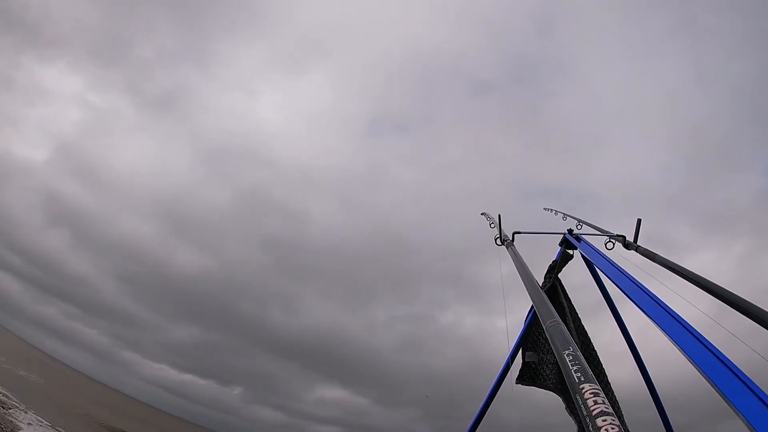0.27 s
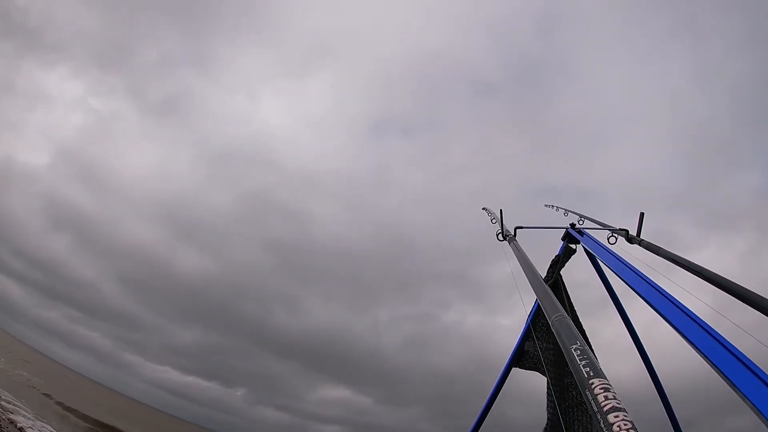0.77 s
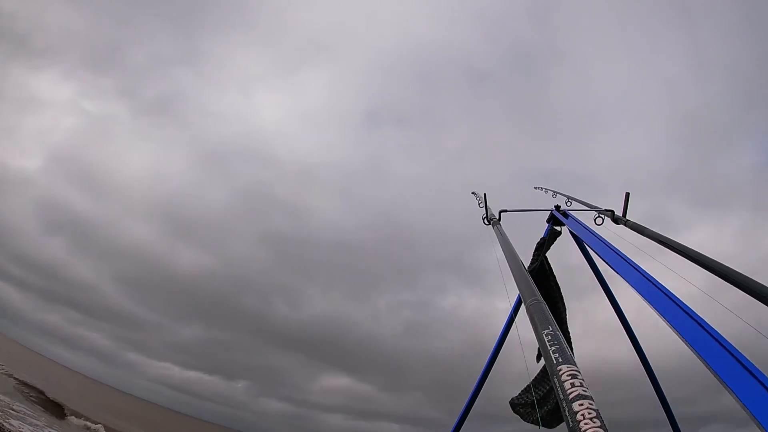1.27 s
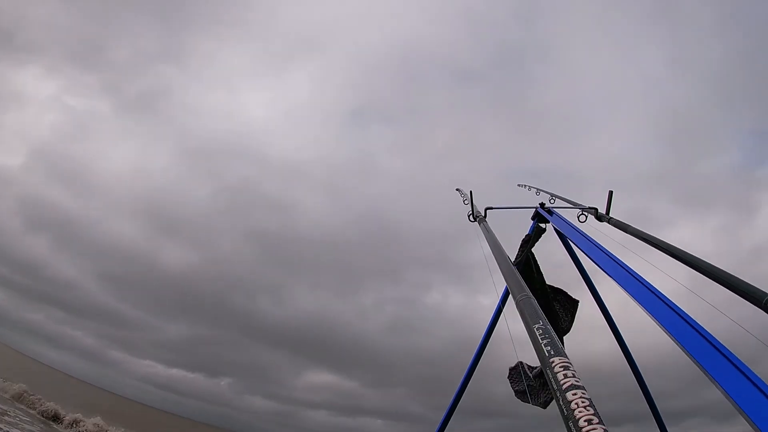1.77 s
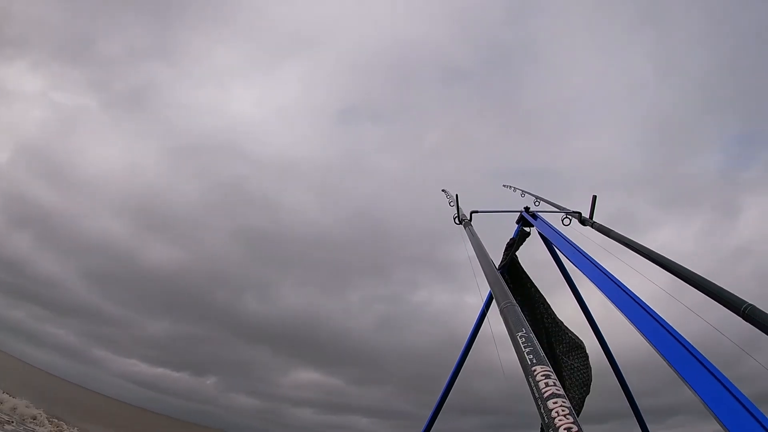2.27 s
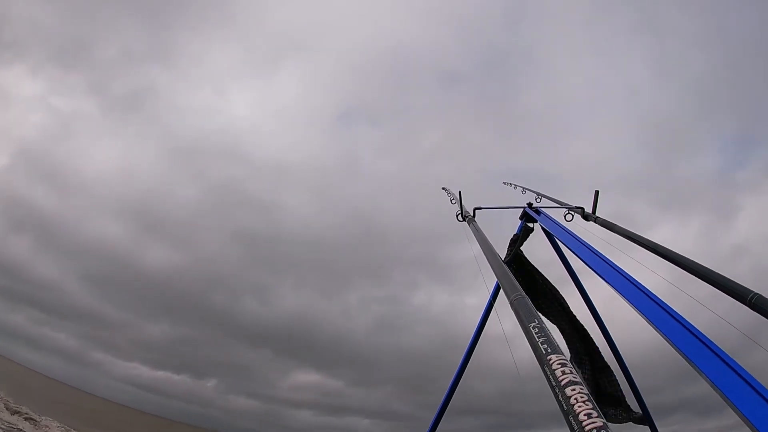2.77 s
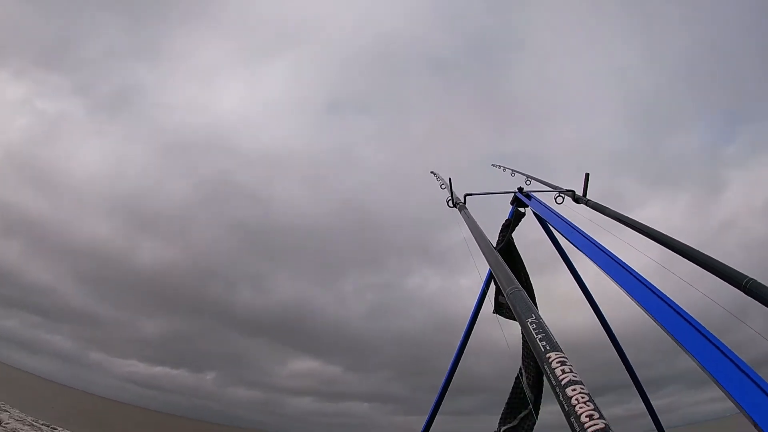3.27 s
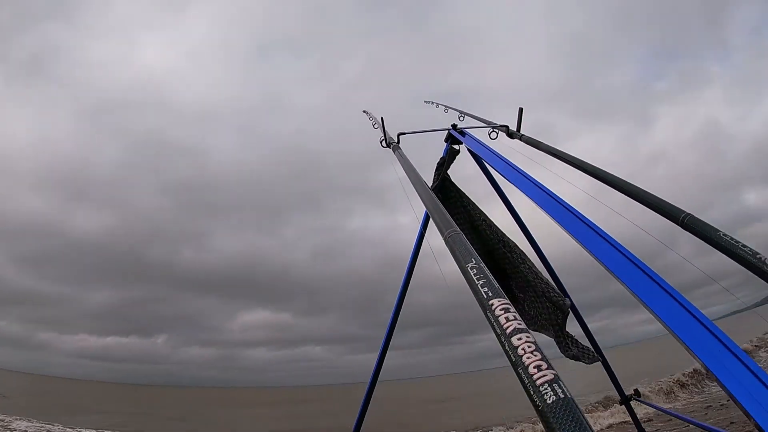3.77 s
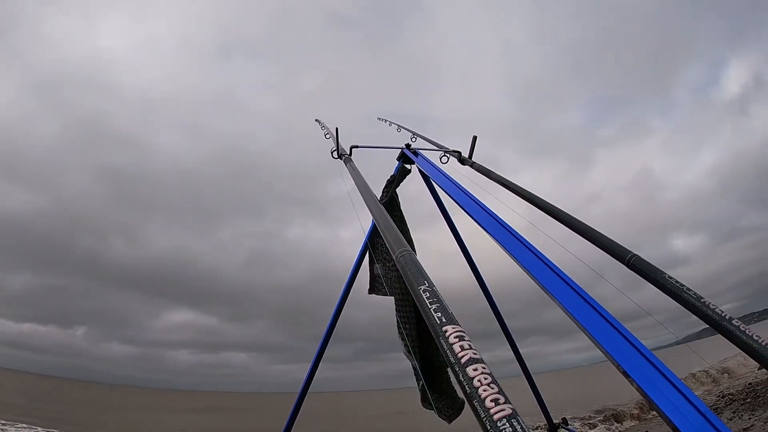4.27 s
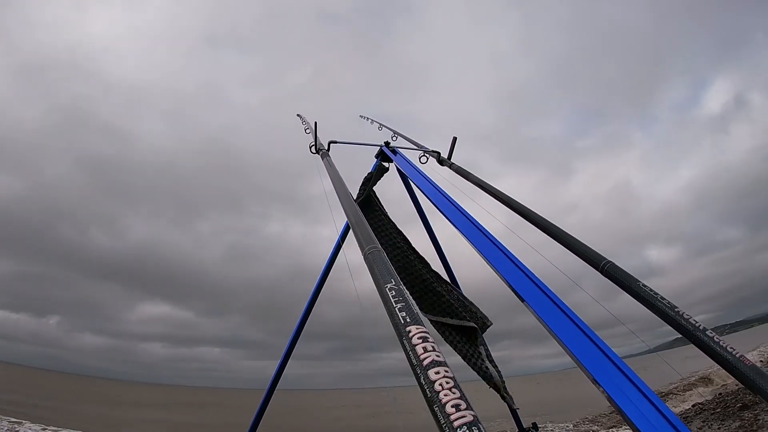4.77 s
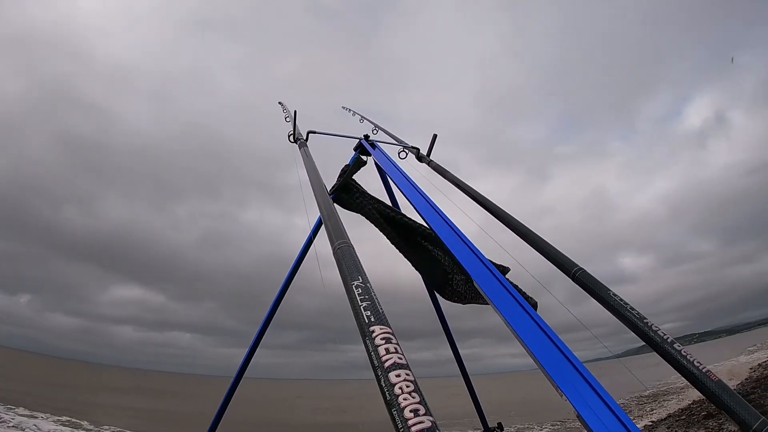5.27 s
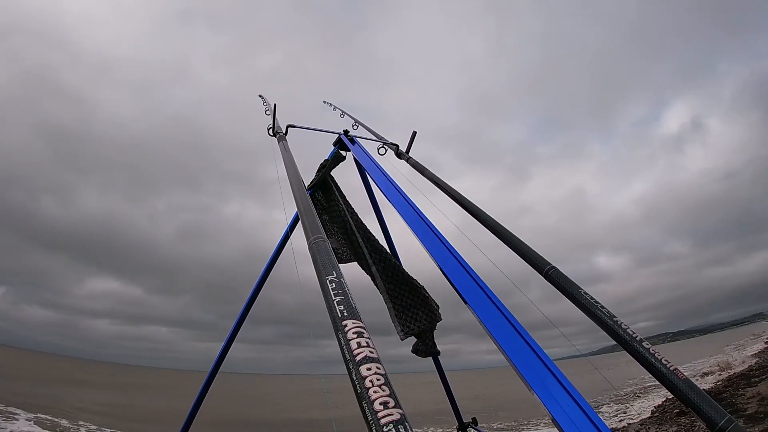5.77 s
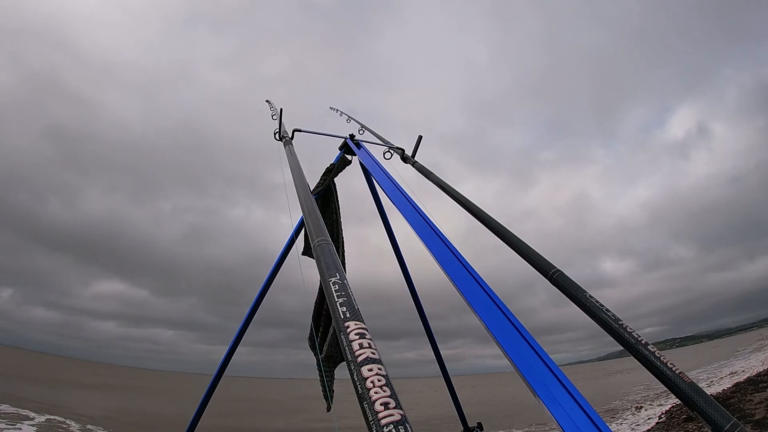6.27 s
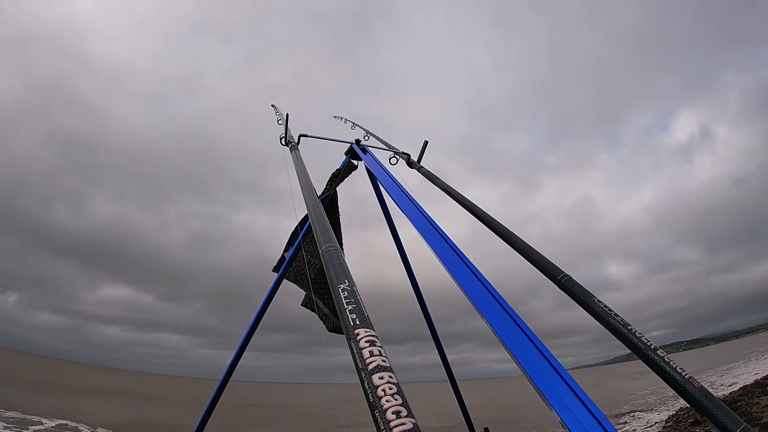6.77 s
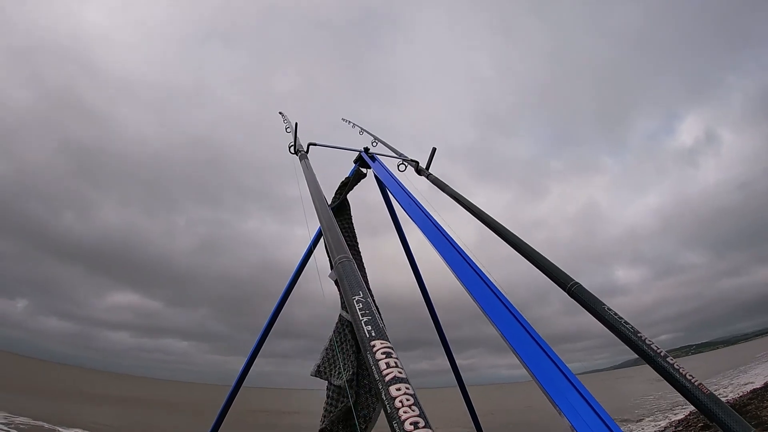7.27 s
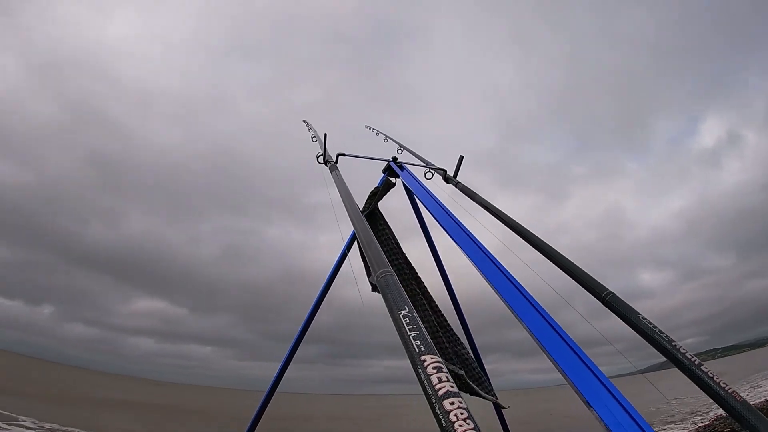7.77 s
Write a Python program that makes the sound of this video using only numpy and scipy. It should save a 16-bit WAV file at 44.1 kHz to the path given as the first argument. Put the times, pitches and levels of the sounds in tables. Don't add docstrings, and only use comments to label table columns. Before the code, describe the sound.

Quiet surf swells on stones under soft wind, interrupted mid-way by loud hollow thumps and sharp plastic cracks, then returns to hissing wash.

```python
import sys
import numpy as np
from scipy import signal
from scipy.fft import rfft, irfft
from scipy.io import wavfile
from scipy.ndimage import uniform_filter1d

SR = 44100
rng = np.random.default_rng(int(sys.argv[2]) if len(sys.argv) > 2 else 0)


def file_out(sig):
    cols = np.atleast_2d(sig).T
    lim = np.clip(cols, -1, 1)
    pcm = np.round(lim * 32767).astype(np.int16)
    wavfile.write(sys.argv[1], SR, pcm)


def invert_db(x):
    u = np.asarray(x, float) / 20
    return 10 ** u


N = 354123
TIME_S = np.arange(N) / SR
HZ = np.fft.rfftfreq(N, 1 / SR)[1:]

# time_s, plunge_db, foam_db
WAVE = [(0.0, -63.5, -58.5), (1.24, -64.5, -56), (1.28, -64.5, -48.5), (1.44, -55, -49.5),
        (2.08, -49.5, -46), (2.72, -43.5, -45.5), (2.9, -49, -47.5), (3.2, -49, -45), (3.84, -48, -48.5),
        (3.92, -55, -56), (4.6, -52, -57), (5.6, -57, -61), (6.3, -53, -56), (6.65, -47.5, -51.5),
        (6.95, -52, -50.5), (7.6, -58, -56.5), (7.75, -60.5, -58.5), (8.03, -61, -58)]
# pitch_hz, level_db (per Hz)
ROAR = [(150, -23.5), (260, -1), (345, -6), (539, -5), (662, -5), (1110, -3), (1200, -5.5), (1560, -15.5),
        (2640, -120)]
SPLASH = [(1000, -40.5), (1200, 3), (1900, 4), (2700, 3.5), (3000, -19)]
FIZZ = [(2600, -15), (3000, 5), (4500, 7.5), (6000, 4), (6800, -14.5), (7200, -23)]
HISS = [(3880, -12.5), (6600, -1.5), (6910, -5.5), (7480, 0), (8060, -4.5), (8650, -2.5), (10100, -14),
        (11500, -31.5), (14400, -28), (15200, -30), (15700, -42)]
# pitch_hz, width_hz, level_db
PORT_OPEN = [(1307, 115, 8), (2030, 57, -12.5), (2248, 210, 9.5), (3000, 380, 0), (3853, 300, 10),
             (4193, 280, -16), (4630, 680, 3.5), (5740, 180, 1), (6780, 170, -6), (7550, 450, 0),
             (13500, 400, -9), (1464, 45, 5), (1923, 70, 6), (11000, 300, 4)]
# pitch_hz, width_hz, level_db
PORT_SHADED = [(1300, 1200, -18.5), (1625, 650, 11.5), (2150, 62, -8), (2690, 660, -8.5), (2900, 200, 6),
               (3290, 260, 7.5), (4140, 270, 3), (4880, 1200, -14), (5900, 960, -6.5), (6650, 460, 1),
               (1603, 54, 8), (2400, 200, 2.5), (4450, 180, 4)]
# middle_s, swell_db, length_ms
SURGES = [(1.30, 0, 60), (1.39, 3.5, 120), (1.59, 2, 35), (1.93, 1.5, 70), (1.99, 0.5, 78), (2.58, 1.5, 88),
          (2.85, 3, 44), (3.40, 6, 58), (5.46, 2, 54), (5.69, 1.5, 110), (6.05, -1, 21), (6.15, 1, 66),
          (6.64, 2, 79), (6.82, 0, 220), (7.12, -1, 140), (7.56, 1.5, 110)]
# time_s, low_shade (0-1), high_shade (0-1), spray_screen (0-1), palm_echo (0-1)
HAND = [(0, 0.32, .1, 0.14, 0.18), (1.2, 0.4, 0, .17, 0.15), (1.3, 0, 0.3, 0.28, 0),
        (1.46, 0, 0.1, 0, 0.52), (2.75, 0.02, 0.22, 0, 0.81), (3.3, 0.6, 0.03, 0.14, 0.44),
        (3.85, 0.97, 0.7, 0.43, 0.5), (4.05, 0.83, 0.5, 0.2, .95), (4.3, 0.68, 0.97, 0.62, 0),
        (4.6, 0.83, 0.77, 0.77, 0), (5.1, 0.94, 0.66, 0.9, 0), (5.45, 0.94, 0.8, 0.7, 0.07),
        (5.65, 0.88, 0.7, 0.4, 0.54), (5.9, 0.33, .66, 0.3, 0.9), (6.3, 0.5, 0.5, 0.17, 1),
        (6.6, 0.32, 0.45, 0, 0.9), (7.3, 0.08, 0.36, 0.18, 0.37), (8.03, 0.48, 0.26, 0.14, 0.25)]
# start_s, added_share (ratio)
PIPE_STARTS = [
    (1.269, 1.3),
    (5.42, 1.6),
]
PIPE_RISE_S, PIPE_FADE_S, PIPE_REST = 0.032, 0.86, -0.6
SPLASH_DB, SPLASH_PLUNGE_SHARE = 3.5, 0.56
HISS_DB, SCREEN_LOSS_DB = -4.5, 26

# start_s, peak_db, pitch_hz, t60_s
KNOCKS = [(2.662, -33, 186, 0.065), (2.812, -23.5, 185, 0.057), (2.828, -34, 205.6, 0.28),
          (2.877, -23.5, 183, 0.1), (3.055, -23, 190, 0.1), (3.0608, -12, 188, 0.097),
          (3.113, -33, 202, 0.11), (3.155, -32.5, 192, 0.14), (3.2, -21, 198, 0.15),
          (3.275, -18.5, 207, 0.18), (3.377, -23.5, 198, 0.12), (3.446, -28.5, 208, 0.29),
          (3.528, -28, 194, 0.11), (3.56, -33, 201, 0.22), (3.659, -27.5, 195, 0.29),
          (3.71, -27.5, 194, 0.16), (3.809, -10, 193, 0.042), (3.8382, -13.5, 199, 0.053),
          (3.8691, -13.5, 183, 0.022), (3.8751, -26.5, 203, .25), (3.9099, -11, 194.7, 0.096),
          (3.929, -15.5, 202.5, 0.19), (3.964, -22, 201, 0.15), (4.131, -14.5, 200, 0.12),
          (4.194, -19, 195, 0.097), (4.231, -16, 197, 0.077), (4.25, -24, 200, 0.12),
          (4.267, -17, 180, 0.069), (4.412, -26.5, 193, 0.13), (7.221, -43, 197, 0.26)]
# start_s, level_db, treble_db, length_ms, hollow_db
SIDE_CRACKS = [(1.554, -30, -15, 5.3, -42), (2.663, -42, 3, 11, 0.5), (2.813, -25, -23, 3.3, -6),
               (2.827, -35.5, -3, 9, -4), (2.876, -32, -18, 3.5, -1), (2.997, -49, 9.5, 2.5, -10),
               (3.0527, -17.5, -15.5, 2.6, -3.5), (3.155, -39, -28, 3, 11), (3.897, -21.5, -22, 13.6, -23),
               (3.906, -16.5, -13, 7.1, -13)]
BACK_CRACKS = [(2.849, -21.5, -14, 4.1, -14), (3.064, -22.5, -24, 8.7, -23), (3.277, -28, -13, 3.4, -23),
               (3.482, -35.5, -28, 15, -11.5), (3.811, -13, -18, 2.5, -33), (3.817, -15, -9.5, 6.1, -12),
               (3.836, -31, -25, 6.2, -10), (3.8654, -11, -16, 5.2, -16.5), (3.93, -33.5, -34, 6.5, 0),
               (3.965, -36, -14, 4.2, -6), (4.13, -39, -12, 6.3, -4), (4.231, -38, -17.5, 6.2, -8),
               (4.249, -40.5, -11, 4.9, -7), (4.265, -42, -24, 6, -11.5)]
LID_CRACKS = [
    (0.259, -54, 7, 4, -30),
    (0.331, -27, -31, 2.5, -40),
    (0.351, -40, -25, 3, -23),
]
# start_s, level_db, treble_db, length_ms, hollow_db
SQUEAKS = [
    (2.984, -33.5, -31, 10, -38),
]
SIDE_HZ, BACK_HZ, LID_HZ, SQUEAK_HZ = 1270, 1680, 1750, 4750
# start_s, level_db, pitch_hz, treble_db, hollow_db
SNAPS = [(2.8134, -22, 1270, -29, -32), (2.829, -22, 1300, -35, -32), (2.846, -22, 1690, -30, -31),
         (2.85, -10, 1680, -23.5, -30), (2.8751, -37, 1250, -31, -18), (3.0529, -18, 1270, -9, -6.5),
         (3.0535, -13, 1270, -8, -14.5), (3.0559, -14, 1280, -19, -15), (3.063, -3, 1690, -14, -15),
         (3.8175, -2, 1680, -12, -14), (3.8265, -11, 1680, -29, -28), (3.8398, -14, 1750, -30, -22),
         (3.848, -16, 1650, -30, -32), (3.8662, -6, 1770, -12, -13), (3.8693, -1, 1740, -17, -18),
         (3.9, -19, 1890, -28, -24), (3.9101, -12.5, 1940, -14.5, -23), (0.3312, -26, 2050, -50, -47),
         (4.132, -26.5, 1650, -35, -23.5), (4.196, -35, 900, -44, -31), (4.2325, -26, 1660, -33.5, -26),
         (4.252, -29, 1600, -39, -29), (4.27, -29, 1750, -37, -29), (0.357, -34, 1700, -55, -55),
         (2.8308, -28, 1700, -30, -36), (3.9675, -25, 1750, -40, -34), (3.9088, -2.5, 1380, -16.5, -17),
         (3.931, -17, 1720, -40, -22)]
# pitch_hz, width_hz, level_db
SHELL_LOW = [(1278, 105, 14), (1770, 150, 16), (2380, 800, 4.2)]
SHELL_HIGH = [(3130, 120, -3), (3890, 166, 11.5), (5100, 730, 6), (6460, 250, -3), (7620, 950, -6.5),
              (9130, 900, -8.5), (11500, 3000, -37)]
# middle_s, level_db, length_ms
STROKES = [(2.82, -43, 120), (3.22, -45, 390), (3.4, -56, 130), (2.852, -43, 35), (3.55, -44.5, 66),
           (3.701, -32.5, 180), (3.836, -32.5, 83), (3.98, -50, 125)]
RUB_TOP_DB = -35.5

# time_s, hum_db
WIND = [(0, -60), (.9, -63), (1.25, -57), (2.0, -52.5), (2.6, -47), (2.9, -49), (2.97, -59.5), (3.2, -36),
        (3.7, -43.5), (3.92, -22.5), (4.1, -52), (4.25, -55), (4.42, -51), (4.65, -52), (5.6, -54.5),
        (6.2, -52), (6.4, -52), (6.9, -60.5)]
# peak_s, buffet_db, flutter_db, fall_10db_ms
GUSTS = [(.03, -47, -53, 105), (.33, -40.5, -60, 78), (.49, -41.5, -59, 34), (.67, -47, -54.5, 100),
         (.94, -40.5, -64, 120), (1.12, -39, -67, 123), (1.43, -40, -50.5, 196), (1.7, -42, -55.5, 200),
         (1.95, -43.5, -50, 120), (2.21, -40.5, -54, 200), (2.57, -35.5, -54, 60), (2.898, -34, -36, 46),
         (3.09, -30, -37, 56), (3.29, -26, -25, 18), (3.4, -30, -48, 45), (3.55, -28, -35, 72),
         (3.9, -28, -33, 28), (4.23, -40, -32, 44), (4.43, -38, -45, 61), (4.63, -34, -50.5, 90),
         (4.85, -38.5, -68, 97), (4.99, -37.5, -66, 102), (5.19, -32, -61, 176), (5.41, -37, -62, 132),
         (5.6, -39.5, -63, 122), (5.9, -40, -67, 150), (6.11, -34.5, -48, 49), (6.46, -43, -70, 200),
         (6.86, -45, -70, 150), (7.25, -40, -54, 63), (7.66, -52, -53, 40), (7.87, -41.5, -58, 40),
         (8.01, -47, -61, 40)]
# start_s, peak_db, length_ms
SLAPS = [(3.375, -14.5, 7.9), (3.526, -21, 5.5), (3.56, -32, 19), (3.812, -14, 3.1), (3.868, -5.5, 3.6),
         (5.41, -45, 30), (5.474, -37, 19), (5.588, -35, 19), (5.925, -33, 22), (6.10, -33, 25)]
# pitch_hz, level_db (per Hz)
BUFFET = [(7.1, -13.5), (12, 2.5), (32, -1.5), (45, -6), (70, -35), (91, -32.5), (150, -120)]
FLUTTER = [(45, -6.5), (60, 4.0), (95, -4), (130, -5.0), (160, -24)]
HUM = [(120, -5.5), (150, 7.0), (260, -11.0), (340, -19.0)]
# pitch_hz, width_hz, level_db
AIR_SPACE = [(213, 110, 17.8)]
BUFFET_DB, BUFFET_FOLLOWS, FLUTTER_DB, FLUTTER_FOLLOWS = -49.5, 0.56, -59.5, 1

# pitch_hz, level_db (per Hz)
SELF_NOISE = [(5000, -1), (9000, 1.5), (12600, -2.5), (13000, -33.0)]
SELF_NOISE_DB = -94
TOP_HZ, TOP_FULL_HZ, LAST_HZ = 9800, 11500, 12800
KEEP_OVER_DB, KEEP_FLOOR_DB, LAST_FLOOR_DB = -1, -122, -108.5


def rms_one(x):
    return x / np.sqrt(np.mean(x ** 2) + 1e-20)


def in_time(rows):
    s, *columns = np.transpose(rows)
    return [np.interp(TIME_S, s, column) for column in columns]


def swell(middle_s, length_ms):
    return np.exp(-(2000 * (TIME_S - middle_s) / length_ms) ** 2)


def place(out, start_s, sound):
    out[round(start_s * SR):][:len(sound)] += sound


def drift(rate):
    r = np.exp(-80 * np.pi * rate / SR)
    noise = rng.standard_normal(N // 40 + 2002)
    slow = signal.lfilter([1], [1, -2 * r, r * r], noise)[2000:]
    return np.interp(np.arange(N) / 40, np.arange(len(slow)), rms_one(slow))


def shaped(x, spectrum, peaks=()):
    hz, level_db = np.transpose(spectrum)
    db = np.interp(np.log(HZ), np.log(hz), level_db, left=-90, right=-90)
    for peak_hz, width, top_db in peaks:
        db = db + top_db / (1 + (2 * (HZ - peak_hz) / width) ** 2)
    return rms_one(irfft(rfft(x) * np.r_[0, invert_db(db)], N))


def resonance(x, hz, width):
    r = np.exp(-np.pi * width / SR)
    poles = [1, -2 * r * np.cos(2 * np.pi * hz / SR), r * r]
    return signal.lfilter([(1 - r * r) / 2, 0, (r * r - 1) / 2], poles, x + 1e-18)


def grains(per_s, spread_db):
    sizes = invert_db(spread_db * np.minimum(rng.exponential(1, N), 5)) * rng.choice([-1, 1], N)
    return rms_one(sizes * (rng.random(N) < per_s / SR))


def surf():
    low_shade, high_shade, screen, echo = np.clip(in_time(HAND), 0, 1)
    plunge_db, foam_db = in_time(WAVE)
    splash_db = SPLASH_DB + foam_db + SPLASH_PLUNGE_SHARE * (plunge_db - foam_db)
    hiss_db = HISS_DB + foam_db - SCREEN_LOSS_DB * screen
    surge_db = 0.85 * drift(4.9) + 0.17 * drift(21)
    for s, db, ms in SURGES:
        surge_db += db * swell(s, ms)
    surge_db += spatter() * (1 - high_shade) * (1 - low_shade)
    # level_db, colour, grains per s, grain share, shade
    layers = [(plunge_db, ROAR, 300, .3, low_shade), (splash_db, SPLASH, 900, .35, low_shade),
              (foam_db, FIZZ, 2500, .35, high_shade), (hiss_db, HISS, 4000, .35, high_shade)]
    out = np.zeros(N)
    for level_db, spectrum, per_s, share, shade in layers:
        water = rng.standard_normal(N) + share * grains(per_s, 1.94)
        heard = np.sqrt(1 - shade) * shaped(water, spectrum, PORT_OPEN)
        heard += np.sqrt(shade) * shaped(water[::-1], spectrum, PORT_SHADED)
        out += invert_db(level_db + surge_db + 0.76 * drift(30)) * heard
    out += pebbles(hiss_db)
    pipe = PIPE_REST
    for s, share in PIPE_STARTS:
        late = np.maximum(TIME_S - s, 0)
        pipe = pipe + share * (1 - np.exp(-late / PIPE_RISE_S)) * np.exp(-(late / PIPE_FADE_S) ** 2)
    return out - echo * resonance(out, 2203, 800) + pipe * resonance(out, 3850, 180)


def pebbles(wash_db):
    out, t = np.zeros(N + SR), np.arange(SR // 25) / SR
    envelope = np.minimum(t / 0.0013, 1) * invert_db(-60 * t / 0.017)
    for when, pitch, size in rng.random((520, 3)):
        hz = 700 * 9 ** pitch
        ping = envelope * np.sin(2 * np.pi * hz * t * (1 + 0.83 * t))
        place(out, when * N / SR, invert_db(9 * size - 3.0 * np.log2(hz / 4000) ** 2) * ping)
    return invert_db(wash_db + 11) * out[:N]


def spatter():
    hits = (rng.random(N) < 18 / SR) * rng.uniform(1.0, 4.5, N)
    return signal.oaconvolve(hits, np.hanning(SR // 100))[:N]


def knocks():
    out, t = np.zeros(N), np.arange(SR // 4) / SR
    rise = 1 - np.exp(-(t / 0.0064) ** 2)
    first_swing = 1.32 * np.exp(-(t / 0.0086) ** 2)
    for s, db, hz, t60 in KNOCKS:
        fall = invert_db(-60 * t / t60) + first_swing
        place(out, s, -invert_db(db + 3.5) * rise * fall * np.sin(2 * np.pi * hz * t))
    return out


def shell(x, modes):
    return sum((-1) ** k * invert_db(db) * resonance(x, hz, width) for k, (hz, width, db) in enumerate(modes))


def muffled(x):
    return signal.sosfilt(signal.butter(4, 7500, fs=SR, output="sos"), x)


def cracks():
    spot, high, deep = np.zeros(N), np.zeros(N), np.zeros(N)
    t = np.arange(SR // 30) / SR
    places = [(SIDE_CRACKS, SIDE_HZ), (BACK_CRACKS, BACK_HZ), (LID_CRACKS, LID_HZ), (SQUEAKS, SQUEAK_HZ)]
    for rows, hz in places:
        for s, db, treble_db, ms, deep_db in rows:
            envelope = np.minimum(3000 * t / ms, 1) * np.exp(-(1000 * t / ms) ** 2)
            burst = invert_db(db) * rng.standard_normal(len(t)) * envelope
            place(spot, s, resonance(resonance(burst, hz, 416), hz, 680))
            place(high, s, invert_db(treble_db) * burst * np.exp(-(t / 0.0065) ** 2))
            place(deep, s, invert_db(deep_db) * burst)
    click = invert_db(11.5) * (t == 0)
    for s, db, hz, treble_db, deep_db in SNAPS:
        place(spot, s, invert_db(db) * resonance(resonance(click, hz, 300), hz, 610))
        place(high, s, np.full(2, invert_db(treble_db + 1)))
        place(deep, s, np.full(1, -invert_db(deep_db - 0.5)))
    sound = invert_db(14.5) * spot
    sound += invert_db(5.5) * shell(high, SHELL_HIGH) + invert_db(15.5) * resonance(high, 2290, 360)
    sound += invert_db(24) * resonance(resonance(deep, 610, 720), 610, 560)
    return muffled(sound)


def rub():
    slips = grains(6600, 2.9)
    sound = rms_one(shell(slips, SHELL_LOW))
    sound += invert_db(-9.0) * rms_one(shell(slips, SHELL_HIGH))
    sound += invert_db(-3.5) * rms_one(resonance(resonance(slips, 910, 710), 720, 900))
    rasp = rms_one(resonance(resonance(slips, 11800, 2500), 11800, 2500))
    sound = muffled(sound) + invert_db(RUB_TOP_DB) * rasp
    pressure = sum(invert_db(db) * swell(s, ms) for s, db, ms in STROKES)
    return pressure * invert_db(1.2 * drift(5)) * sound


def wind():
    hum_db, = in_time(WIND)
    swing_db = hum_db - hum_db.mean()
    buffet_gain = invert_db(BUFFET_DB + BUFFET_FOLLOWS * swing_db)
    flutter_gain = invert_db(FLUTTER_DB + FLUTTER_FOLLOWS * swing_db)
    for s, buffet_db, flutter_db, ms in GUSTS:
        lump = invert_db(-10000 * np.abs(TIME_S - s) / ms)
        buffet_gain = np.maximum(buffet_gain, invert_db(buffet_db) * lump)
        flutter_gain = np.maximum(flutter_gain, invert_db(flutter_db) * lump)
    out = buffet_gain * shaped(rng.standard_normal(N), BUFFET)
    out += flutter_gain * invert_db(4.7 * drift(24)) * shaped(rng.standard_normal(N), FLUTTER)
    out += invert_db(hum_db + 2.5 * drift(14)) * shaped(rng.standard_normal(N), HUM, AIR_SPACE)
    for s, db, ms in SLAPS:
        place(out, s, -invert_db(db) * np.hanning(round(ms * SR / 1000)))
    return out


def scene():
    return (surf() + knocks() + cracks() + rub() + wind())[None]


def thin_treble(sound):
    hz, _, cells = signal.stft(sound[0], SR, nperseg=2048)
    patch = uniform_filter1d(np.abs(cells) ** 2, size=5, axis=0)
    around = uniform_filter1d(patch, size=61, axis=0)
    thinning = np.clip((hz - TOP_HZ) / (TOP_FULL_HZ - TOP_HZ), 0, 1)[:, None]
    floor = invert_db(np.where(hz > LAST_HZ, LAST_FLOOR_DB, KEEP_FLOOR_DB))[:, None]
    kept = patch >= thinning * np.maximum(around * invert_db(KEEP_OVER_DB) ** 2, floor ** 2)
    return signal.istft(cells * kept, SR, nperseg=2048)[1][None, :N]


def top_cut(x):
    return signal.sosfilt(signal.butter(12, 15600, fs=SR, output="sos"), x)


def record(dry):
    hiss = shaped(rng.standard_normal(N), SELF_NOISE)
    mix = 1.2 * np.tanh(dry / 1.2) + invert_db(SELF_NOISE_DB + 7) * hiss
    mix = thin_treble(mix)
    return top_cut(mix)


dry = scene()
out = record(dry)
file_out(out)
```